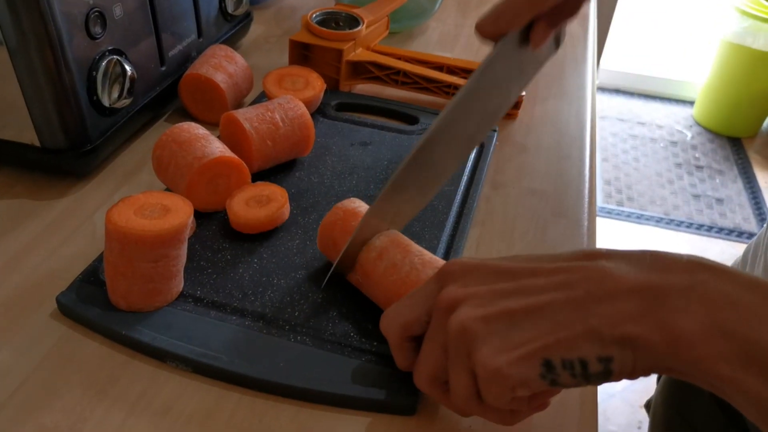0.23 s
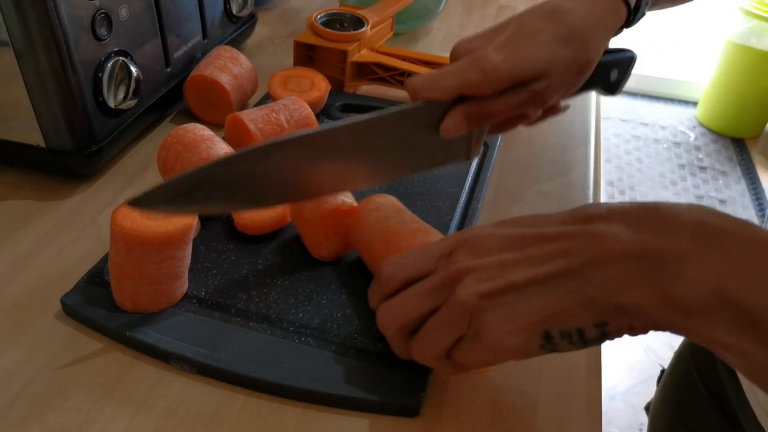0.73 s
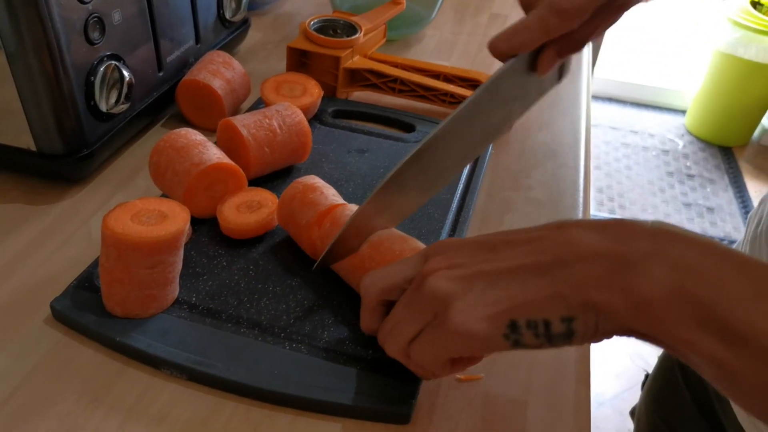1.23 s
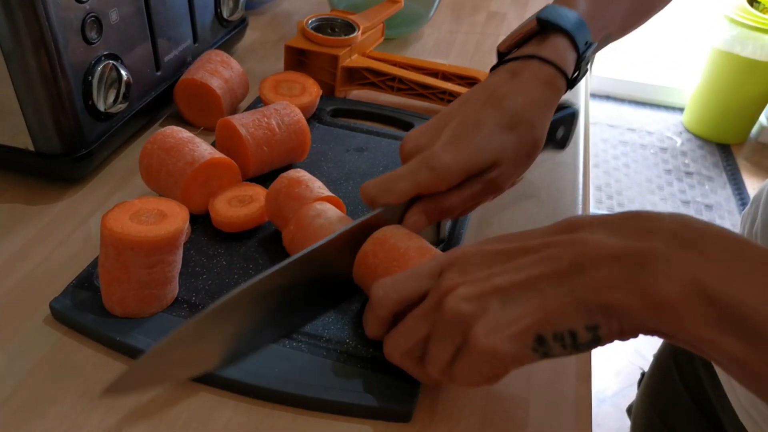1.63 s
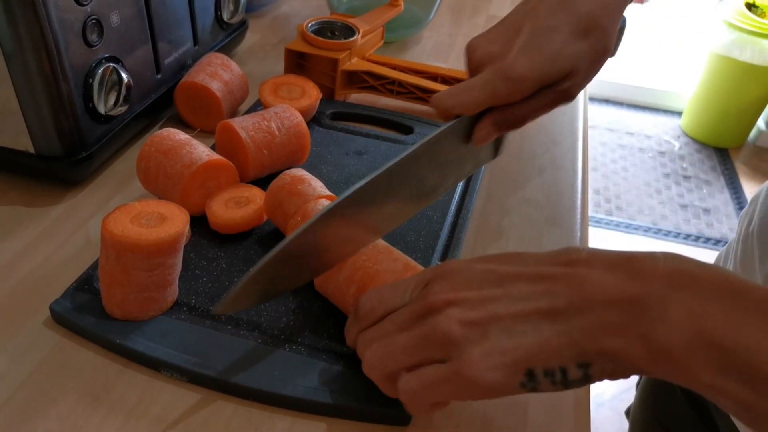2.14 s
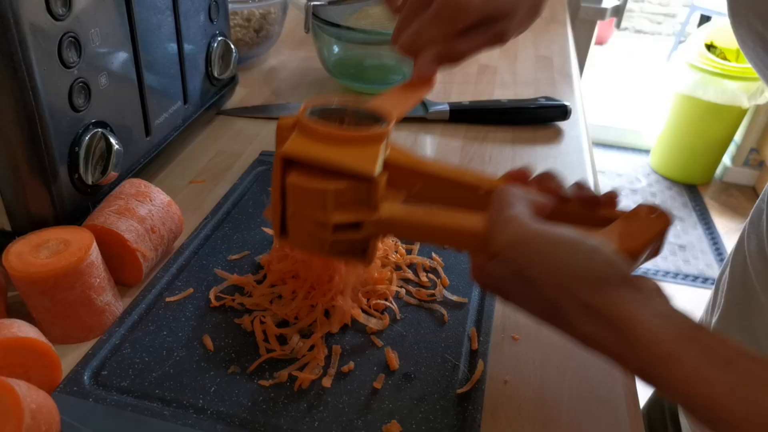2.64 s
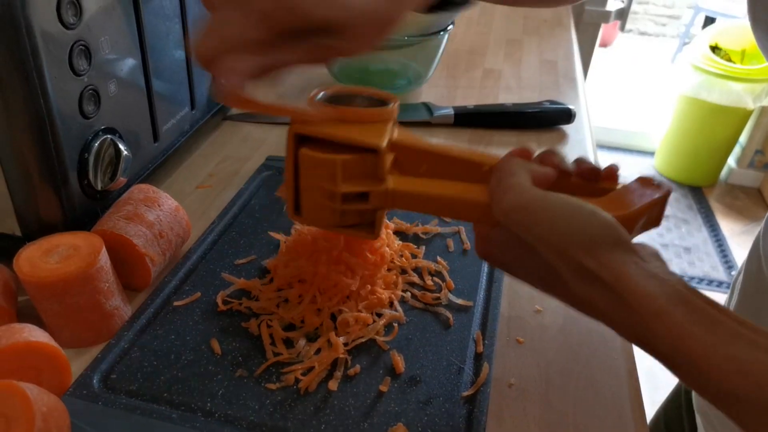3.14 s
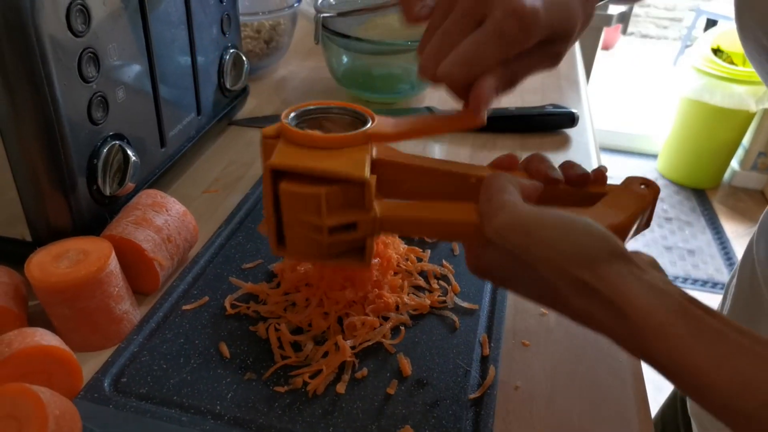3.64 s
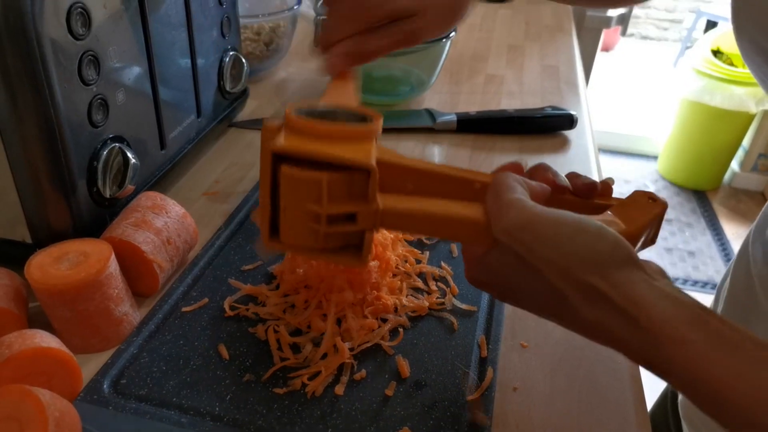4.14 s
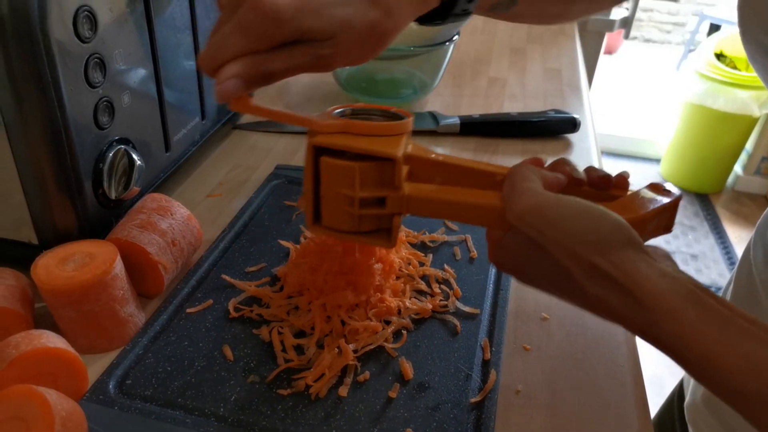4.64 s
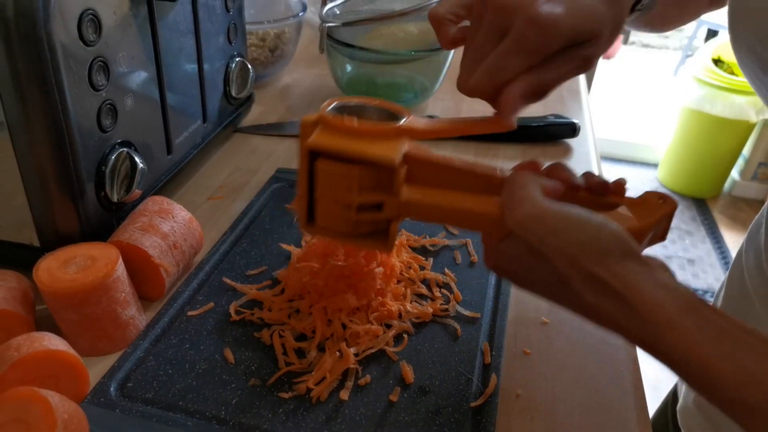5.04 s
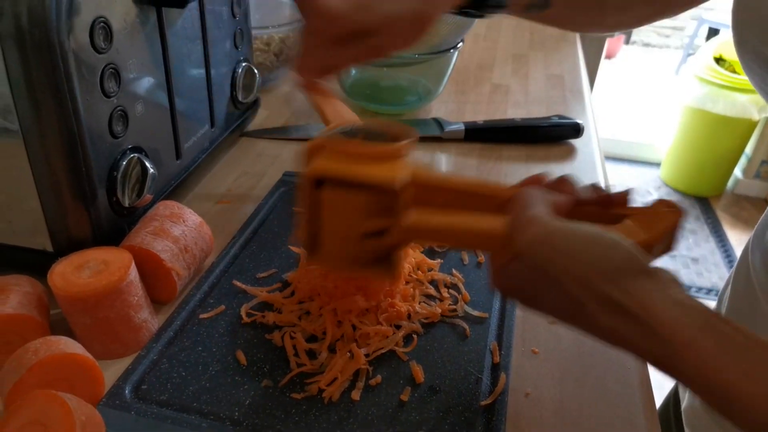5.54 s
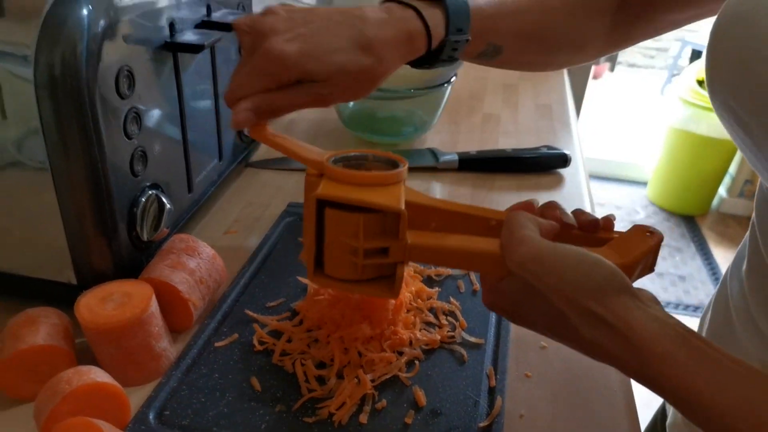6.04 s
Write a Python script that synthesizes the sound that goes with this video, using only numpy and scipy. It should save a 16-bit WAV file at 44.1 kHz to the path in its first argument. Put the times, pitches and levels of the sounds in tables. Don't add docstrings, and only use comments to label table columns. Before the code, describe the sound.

A knife crunches through raw carrot three times with wet snaps and hard board knocks, then, after a brief silence, a hand-cranked grater rasps rhythmically.

```python
import sys
import numpy as np
from scipy import signal
from scipy.fft import rfft, irfft, next_fast_len
from scipy.io import wavfile
from scipy.ndimage import uniform_filter1d

SR = 44100
rng = np.random.default_rng(int(sys.argv[2]) if len(sys.argv) > 2 else 0)


def store_pcm(level_fs):
    pcm = np.round(np.clip(level_fs, -1, 1) * 32767).astype(np.int16)
    wavfile.write(sys.argv[1], SR, np.atleast_2d(pcm).T)


def to_linear_factor(level_db):
    exponent = np.asarray(level_db, float) / 20
    return 10 ** exponent


N = 277829
TIME = np.arange(N) / SR
KNIFE_END_S = 2.9
CUT_S, SILENT_S, RESUME_S = 2.6625, 2.697, 3.067

# pitch_hz, density_db (per Hz)
HUM_SPECTRUM = [(22, -18), (42, 4.5), (106, -3.5), (352, -9.5), (404, -23), (631, -14.5), (985, -22),
                (1870, -21), (4070, -27.5), (7730, -29.5), (9660, -39.5), (12000, -42.5), (15500, -47.5)]
# pitch_hz, t60_s
KITCHEN_DECAY = [(100, 0.32), (500, 0.31), (2000, 0.33), (6000, 0.14), (14000, 0.22)]
# (pitch_hz, left_minus_right_db)
AT_BOARD = ([(60, 1), (500, 1), (1200, 0.54), (2500, 0.04), (4500, -0.3), (8000, -0.5), (15000, -2.6)],
            [(100, .04), (500, 0.2), (1500, 0.5), (4000, -3.5), (15000, -4.5)], [(60, 1.5), (600, 2),
            (1400, 0.5), (3000, -4.5), (5700, -6.5), (6700, -2.8), (7750, 18.5), (9000, 4), (11000, -2.5),
            (15000, -4)])
AT_GRATER = ([(45, .97), (100, .85), (250, .7), (700, .82), (1400, .7), (2050, .6), (2350, .33),
             (3100, .62), (3500, .35), (4200, .56), (5000, .27), (8000, .2), (15000, .1)], [(1100, .02),
             (1500, .5), (2400, .5), (3000, 2.3), (3600, 3.1), (4600, 3.7), (5500, 3.0), (7000, 3.6),
             (8000, 5.8), (11000, 9.5), (15000, 12.5)], [(300, 1.1), (1400, -2.5), (1750, .5),
             (2650, -10.5), (3200, -7.5), (3800, -.5), (5000, 5.5), (6300, 4.5), (7750, 17), (9300, 7.5),
             (15000, 15)])

# start_s, first_db, climb_s, peak_db, fade_db_per_s
LEANS = [
    (0, -52, 0.009, -64, 147),
    (.25, -70.5, 0.23, -63.5, 14),
    (.66, -58, 0.0079, -52.5, 65),
    (.83, -64, 0.014, -55, 148),
    (.97, -68.5, 0.14, -50, 311),
    (1.25, -73, 0.19, -52, 1),
    (1.5, -66.5, .09, -58.5, 34.5),
    (1.76, -52, 0.0036, -44.5, 99),
    (2.0, -69.5, 0.13, -68, 104),
    (2.28, -79, 0.28, -67.5, 408.5),
]
# pitch_hz, density_db (per Hz)
CREAK_SPECTRUM = [(29, -38), (50, -4.5), (101, -1), (367, -8.5), (455, -8), (585, -21), (784, -21),
                  (1200, -35), (1560, -68), (2640, -120)]
# pitch_hz, density_db (per Hz)
FIZZ_SPECTRUM = [(290, -48), (500, -9), (585, 2.5), (766, -25.5), (883, -7.5), (1020, -23), (1300, -13.5),
                 (1700, -24), (2200, -1.5), (4170, -4.5), (4600, -2.5), (5950, -4), (7790, 1),
                 (8860, -13.5), (15000, -27)]
# pitch_hz, level_db, t60_s
EDGE_MODES = [(1800, 3, 0.0088), (2790, -12.5, 0.03), (4200, -12.5, 0.016), (4360, -8.5, 0.015),
              (5700, -1, 0.024), (7260, -14.5, 0.005), (6345, -7, .01), (7940, -4, 0.036)]
# start_s, first_db, climb_s, peak_db, fade_db_per_s
SLIDES = [(0, -73.5, 0.2, -68, 164), (.28, -81, 0.047, -55, 5), (.33, -59, 0.071, -43.5, 7),
          (.397, -41.5, 0.064, -35.5, 275.5), (.505, -48, 0.099, -50.5, 244), (.675, -61, 0.0046, -54, 178),
          (1.086, -56.5, 0.0049, -52, 443), (1.135, -72, 0.037, -64.5, 199), (1.255, -66, 0.047, -57, 220),
          (1.362, -70, 0.043, -60, 5), (1.403, -56, 0.087, -34.5, 202), (1.535, -47.5, 0.025, -38, 251.5),
          (1.574, -54, 0.0097, -29.5, 601), (1.618, -52, .005, -41.5, 176.5), (1.758, -73, .006, -65.5, 93),
          (1.84, -76, 0.036, -70, 200), (2.152, -44, 0.0045, -48.5, 400), (2.21, -68, 0.068, -71, 141),
          (2.325, -72.5, 0.27, -54.5, -7.5), (2.568, -48, 0.017, -42.5, 104), (2.6, -44, 0.045, -33, 902)]
# time_s, edge_over_fizz_db, crispness_db, air_db
SINGING = [(.3, -5, 3.5, -1), (.44, -4.5, 3.5, 0.5), (.5, -4.5, 2, -4.5), (.6, -6, -0.5, -13.5),
           (1.05, -4, 0, -7.5), (1.1, -2, 4, 2), (1.4, -3, 3, 1), (1.49, -5, 2.5, 0), (1.559, -4.5, 2, -1),
           (1.6, -5, -0.5, -12.5), (1.8, -5, 1, -12), (1.87, -5.5, 5, -2), (2.2, -4.5, 1.5, 0),
           (2.55, -3, 5, 0.5), (2.641, -3.5, 3, 1.5)]
# pitch_hz, level_db, t60_s
BOARD = [(131, 0.5, 0.23), (195.7, -7.5, 0.019), (269, -6, 0.26), (376, -4, 0.11), (418, -9, 0.072),
         (600, 4.5, 0.05), (696, 1.5, 0.095), (855, 5.5, 0.025), (1048, -16, 0.021), (1197, 7.5, 0.03),
         (1269, 4, 0.058), (1650, 12, 0.0039), (1853, 2, 0.037), (2155, 6.5, 0.0059), (2760, 0, 0.04),
         (3120, 12.5, 0.004), (3200, -2.5, 0.011), (4190, -6.5, 0.011), (4550, 10, 0.014),
         (5240, -14.5, .01)]
# pitch_hz, level_db, t60_s
BLADE = [(5780, 12.5, 0.053), (7550, -8, .05), (9520, -16, 0.028)]
# pitch_hz, level_db, t60_s
CARROT = [(860, -19, 0.034), (1215, -1, .035), (1253, -3.5, .07), (1495, -9, 0.033), (1904, -10, 0.044),
          (2400, -4.5, 0.033)]
# time_s, peak_db, favoured_hz, rattle_s
SNAPS = [
    (.4462, -8.5, 1560, 0.0044),
    (.452, -16, 2075, 0.0022),
    (.461, -25, 1700, 0.0044),
    (1.5072, -12, 1462, 0.0057),
    (1.5125, -13.5, 1422, 0.0044),
    (2.642, -7.5, 1666, 0.0025),
    (2.6465, -11, 1526, .003),
]
# time_s, peak_db, favoured_hz, rattle_s
STRIKES = [
    (.519, -14, 815, 0.0058),
    (.5245, -11, 630, 0.004),
    (.574, -33.5, 635, 0.019),
    (1.581, -14, 644, 0.0083),
    (1.6115, -18, 800, 0.0025),
    (1.631, -21, 800, 0.0036),
    (2.652, -16, 490, 0.0036),
    (2.6585, -19.5, 1286, 0.0048),
]
# time_s, peak_db, favoured_hz, rattle_s
SLAPS = [
    (.541, -14, 1468, 0.0051),
    (.546, -13, 1230, 0.0027),
    (1.7645, -28, 1216, 0.0069),
]
# time_s, peak_db, favoured_hz, rattle_s
LANDINGS = [
    (1.5895, -4.5, 1100, 0.0041),
    (1.5935, -9, 1527, 0.0017),
    (1.599, -17.5, 1183, .003),
]
# time_s, peak_db, favoured_hz, rattle_s
TAPS = [
    (.943, -55, 1300, .0005),
    (1.0835, -39.5, 900, 0.0002),
    (1.896, -60, 1800, 0.0051),
]
# time_s, peak_db, favoured_hz, rattle_s
THUMPS = [
    (.522, -31.5, 135, .005),
    (1.583, -24, 135, .005),
    (2.644, -34.5, 140, 0.0033),
    (1.003, -50, 122, 0.0039),
    (1.101, -53, 139.4, 0.02),
    (1.14, -58, 130, 0.012),
    (2.168, -49.5, 131, 0.0072),
    (2.51, -56.5, 251, 0.026),
    (2.56, -54, 255, 0.036),
    (2.605, -44.5, 255, 0.022),
]
# time_s, peak_db, favoured_hz, rattle_s
TIPS = [
    (1.085, -48.5, 2400, 0.0076),
    (2.142, -70, 3000, 0.0012),
    (2.153, -49, 2540, 0.0043),
]
# time_s, peak_db, favoured_hz, rattle_s
ROLLS = [
    (.780, -42.5, 440, 0.0065),
    (.798, -44.5, 402, 0.0039),
    (.85, -51, 600, 0.0067),
    (.868, -53, 503, 0.0077),
    (1.895, -45.5, 405, 0.0059),
    (1.912, -56, 333, 0.0041),
    (1.947, -59, 244.7, 0.017),
    (2.514, -52.5, 1750, .014),
]
# blows (a table above), spread_octaves, partner_modes, partner_db, dry_crack_db
KINDS = [
    (SNAPS, 0.464, CARROT, 4, -15),
    (STRIKES, 1.1, BLADE, -36, -19),
    (LANDINGS, .9, BLADE, -16.5, -22.5),
    (SLAPS, 0.71, BLADE, -33, -15),
    (TAPS, 1.25, BLADE, -37, -18),
    (TIPS, .3, BLADE, -20, -12),
    (ROLLS, .5, BLADE, -60, -36.5),
    (THUMPS, 0.27, BLADE, -70.5, -50),
]

# pitch_hz, density_db (per Hz)
SHAKE_SPECTRUM = [(22, -11), (38, 2), (48, -3.5), (60, -19), (70, -33), (102, 2), (173, -37.5), (400, -20),
                  (520, -70), (880, -120)]
# pitch_hz, density_db (per Hz)
DRUM_SPECTRUM = [(250, -29.5), (430, -30.5), (620, -21.5), (800, -22.5), (1270, -16), (1780, -13.5),
                 (2050, -3), (3070, 1), (4250, -12), (5530, -8), (6500, -14), (7800, -7), (9900, -23.5),
                 (15000, -27.5)]
# pitch_hz, level_db, t60_s
HOUSING_MODES = [(800, 6.5, 0.044), (1499, 2.5, 0.184), (2089, 18.5, 0.059), (2700, -45, 0.056),
                 (2980, 9.5, 0.104), (3200, 12, 0.2), (3570, 4, 0.097), (4596, 2, 0.18), (5940, -29, 0.051),
                 (7950, 12.5, 0.17), (9400, 0, 0.024)]
# start_s, first_db, climb_s, peak_db,
# fade_db_per_s
STROKES = [(3.068, -45, 0.045, -34.5, 326.5), (3.224, -45, 0.061, -37, 391), (3.36, -51.5, 0.042, -39, 2),
           (3.53, -47, 0.078, -33, 264), (3.743, -43, 0.061, -35.5, 151), (3.905, -52, 0.061, -31.5, 291),
           (4.109, -38.5, 0.059, -33.5, 177), (4.24, -38, 0.14, -33.5, 100), (4.41, -36, 0.06, -37, -5),
           (4.567, -27, 0.0046, -29.5, 163), (4.615, -36, 0.044, -33.5, 321),
           (4.807, -33.5, 0.063, -34.5, 392), (4.89, -39, 0.065, -37.5, 170),
           (4.98, -36.5, 0.095, -33, 55.5), (5.09, -39, 0.026, -32.5, 151), (5.22, -43.5, 0.088, -30, 446),
           (5.352, -29.5, 0.012, -33, 202), (5.41, -42.5, 0.053, -30, 148), (5.495, -32, 0.0032, -33, 397),
           (5.6, -38, 0.062, -30.5, 142), (5.7, -34, 0.05, -32, 150), (5.78, -39, 0.0063, -29.5, 306),
           (5.825, -38.5, 0.075, -35, -12), (5.95, -27, 0.038, -32, 19),
           (4.074, -59, 0.031, -48.5, 7),
    (5.573, -67, 0.024, -47.5, 9),
    (6.075, -32, 0.073, -33.5, 152),
    (6.198, -34.5, 0.019, -33, 13.5),
]
# time_s, peak_db, favoured_hz
CATCHES = [(3.0745, -31, 2850), (3.1098, -23, 2670), (3.1216, -13.5, 2700), (3.0847, -21, 2700),
           (3.222, -27.5, 3280), (3.2496, -15, 3050), (3.572, -26, 2540), (3.2961, -26, 3480),
           (3.6119, -41, 2610), (3.742, -19.5, 2975), (3.9353, -32, 3020), (4.107, -27, 2802),
           (4.1143, -24, 3010), (4.2029, -9.5, 3200), (4.339, -35, 2790), (4.5695, -8.5, 2000),
           (4.808, -15.5, 1840), (5.063, -29, 2430), (5.1144, -39, 2570), (5.2795, -20, 2840),
           (5.3145, -15, 3000), (5.3214, -13.5, 2100), (5.3269, -13.5, 2300), (5.361, -22, 2800),
           (5.4322, -21, 3050), (5.4568, -18, 2980), (5.4655, -9, 2980), (5.603, -25, 2550),
           (5.612, -23, 3050), (5.6395, -16, 3270), (5.654, -12, 3100), (5.788, -17, 2560),
           (5.8743, -14.5, 2140), (5.9556, -8.5, 2800), (6.0144, -19, 3120), (6.0894, -18.5, 2910),
           (6.2022, -27, 2840)]


def evened(x):
    return x / np.sqrt(np.mean(x ** 2) + 1e-20)


def band_level(x, lo_hz, hi_hz):
    z, hz = rfft(x[0]), np.fft.rfftfreq(N, 1 / SR)
    band = (hz > lo_hz) & (hz < hi_hz)
    return x / np.sqrt(2 * np.sum(abs(z[band]) ** 2)) * N


def read(points, hz):
    f, value = np.transpose(points)
    return np.interp(np.log(hz + 1), np.log(f + 1), value)


def coloured(x, points):
    gain_db = read(points, abs(np.fft.fftfreq(4096, 1 / SR)))
    log_gain = np.log(to_linear_factor(np.maximum(gain_db, -100)))
    taps = np.fft.ifft(np.exp(np.conj(signal.hilbert(log_gain)))).real[:2048]
    return signal.oaconvolve(x, taps[None], axes=1)[:, :N]


def filtered(x, order, edge_hz, kind):
    return signal.sosfilt(signal.butter(order, edge_hz, kind, fs=SR, output="sos"), x)


def above(x, edge_hz):
    return filtered(x, 3, edge_hz, "high")


def upper(x, edge_hz):
    return signal.sosfiltfilt(signal.butter(3, edge_hz, "high", fs=SR, output="sos"), x)


def smoothed_twice(x, size):
    return uniform_filter1d(uniform_filter1d(x, size), size)


def wander(depth_db):
    return depth_db * evened(smoothed_twice(rng.standard_normal(N), 1500))


def efforts(rows, rest_db, bend):
    rows = np.array(rows)
    current = np.maximum(np.searchsorted(rows[:, 0], TIME) - 1, 0)
    start, first_db, climb, peak_db, fade = rows[current].T
    since = TIME - start
    climb = np.maximum(climb, 1e-3)
    rise = (peak_db - first_db) * np.clip(since / climb, 0, 1)
    fall = fade / 10 * (10 * np.maximum(since - climb, 0)) ** bend
    return uniform_filter1d(np.maximum(first_db + rise - fall, rest_db), size=200)


def grit(per_s, spread_db, flutter_db, flutter_s):
    size = to_linear_factor(spread_db * np.minimum(rng.exponential(1, (2, N)), 4))
    happens = rng.random((2, N)) < per_s / SR
    train = size * rng.standard_normal((2, N)) * happens
    width = max(int(flutter_s * SR), 1)
    flutter = evened(smoothed_twice(rng.standard_normal(N), width))
    return train * to_linear_factor(flutter_db * flutter)


def patchy(x, depth_db, bins=2, frames=7):
    z = signal.stft(x, nperseg=512, noverlap=384)[2]
    field = rng.standard_normal(z.shape[1:])
    for _ in range(2):
        field = uniform_filter1d(uniform_filter1d(field, bins, 0), frames, 1)
    return signal.istft(z * to_linear_factor(depth_db * evened(field)), nperseg=512, noverlap=384)[1][:, :N]


def rings(modes, favoured_hz=1000, octaves=np.inf, detune=0., size=6000):
    hz, db, t60 = np.transpose(modes)[:, :, None]
    hz = hz * (1 + detune * rng.standard_normal(hz.shape))
    t = TIME[:size]
    weight = np.exp(-0.5 * (np.log2(hz / favoured_hz) / octaves) ** 2)
    weight = weight + 0.015 * (hz < favoured_hz)
    sign = (-1.) ** np.arange(len(modes))[:, None]
    return (sign * weight * to_linear_factor(db - 60 * t / t60) * np.sin(2 * np.pi * hz * t)).sum(0)


def add(mix, s, peak_db, rattle_s, body):
    u = TIME[:2000] / max(rattle_s, 1e-6)
    first_touch = 0.6 * np.exp(-8 * u)
    burst = np.exp(-np.minimum(u, 9) ** 4)
    settling = 0.3 * np.exp(-u / 1.6)
    force = first_touch + burst + settling
    contacts = rng.choice([-1., 1.], (2, len(u))) * force
    sound = signal.fftconvolve(contacts, body[None], axes=1)
    sound = sound / abs(sound).max(1, keepdims=True)
    part = mix[:, round(s * SR):][:, :sound.shape[1]]
    part += to_linear_factor(peak_db) * sound[:, :part.shape[1]]


def room_hum():
    noise = to_linear_factor(-66.5) * evened(coloured(rng.standard_normal((2, N)), HUM_SPECTRUM))
    phase = 2 * np.pi * np.cumsum(97 + wander(1.2)) / SR
    return noise + to_linear_factor(-74 + wander(1.7)) * np.sin(phase)


def kitchen(x, wet_db):
    taps = np.zeros((2, SR // 2))
    slots = np.arange(200, SR // 2 - 20, 20)
    at = slots + rng.integers(0, 20, (2, len(slots)))
    np.put_along_axis(taps, at, rng.choice([-1., 1.], at.shape), 1)
    hz, t, z = signal.stft(taps, SR, nperseg=256)
    decay = to_linear_factor(-60 * t / read(KITCHEN_DECAY, hz)[:, None])
    tail = signal.istft(z * decay, SR, nperseg=256)[1]
    return to_linear_factor(wet_db) * signal.fftconvolve(x, tail / np.linalg.norm(tail[0]), axes=1)[:, :N]


def creak():
    level_db = efforts(LEANS, -88.0, 0.52)
    slips = coloured(grit(1100, 2.3, 3.4, 0.014), CREAK_SPECTRUM)
    return to_linear_factor(level_db - 1.5) * band_level(slips, 73, 500)


def fizz():
    level_db = efforts(SLIDES, -98, 0.97)
    at, *colours = np.transpose(SINGING)
    sing_db, crisp_db, air_db = (np.interp(TIME, at, db) for db in colours)
    cells = grit(12000, 1.5, 0.46, 0.002)
    edge = signal.oaconvolve(cells, rings(EDGE_MODES)[None], axes=1)[:, :N]
    sound = band_level(coloured(cells, FIZZ_SPECTRUM), 4000, 10000) + to_linear_factor(sing_db) * evened(edge)
    sound = sound + (to_linear_factor(crisp_db) - 1) * upper(sound, 4300)
    sound = sound + (to_linear_factor(air_db) - 1) * upper(sound, 9000)
    return to_linear_factor(level_db) * band_level(patchy(sound, 0.81), 2900, 10000)


def blows():
    ringing, thrown, cracks = np.zeros((3, 2, N))
    for rows, octaves, partner, partner_db, crack_db in KINDS:
        spread = max(octaves, 0.2)
        for s, db, hz, rattle_s in rows:
            board = rings(BOARD, hz, spread, detune=0.04)
            add(ringing, s, db, rattle_s, board + to_linear_factor(partner_db) * rings(partner, detune=0.01))
            onset = rings(BOARD, hz, 1.2 * spread, size=600) * np.exp(-TIME[:600] / 0.0022)
            add(thrown, s, db + 10 * np.log10(rattle_s / 0.0015), 0, onset)
            add(cracks, s, db + crack_db, rattle_s, np.ones(1))
    cracks = filtered(cracks, 3, [1700, 7000], "band")
    ringing += cracks + kitchen(thrown + to_linear_factor(-4) * cracks, -4.5) + kitchen(ringing, -16.5)
    ringing = filtered(ringing, 3, [75, 8500], "band")
    return filtered(ringing, 2, 11000, "low")


def knife():
    return (creak() + fizz() + blows()) * (TIME < KNIFE_END_S)


def shake():
    return to_linear_factor(-64.5) * evened(coloured(grit(6100, 0.55, 1.3, 0.039), SHAKE_SPECTRUM))


def catches():
    sound = np.zeros((2, N))
    damped = [(hz, db, t60 / 5) for hz, db, t60 in HOUSING_MODES]
    for s, db, hz in CATCHES:
        add(sound, s, db - 9.5, 0.0008, rings(damped, hz, 0.36, detune=0.03, size=2500))
    return above(sound, 1260)


def shredding():
    scrape_db = efforts(sorted(STROKES), -67.0, 1.53)
    load_db, since = scrape_db + 36, TIME - RESUME_S
    bright_db = -7 - 0.22 * load_db + 0.95 * since + wander(1.05)
    full_db = -3.5 + 0.47 * load_db - 2 * since + wander(1.05)
    rasp = evened(grit(14000, 0.83, 0.99, 0.0091))
    crackle = evened(grit(2500, 4.6, 1.8, 0.004))
    tearing = rasp + to_linear_factor(-7) * crackle
    housing = above(signal.oaconvolve(tearing, rings(HOUSING_MODES)[None], axes=1)[:, :N], 830)
    drum = band_level(coloured(tearing, DRUM_SPECTRUM), 2070, 4600) + to_linear_factor(-8.5) * evened(housing)
    drum = patchy(drum, 2.1, frames=5)
    teeth = (to_linear_factor(bright_db + 5.5) - 1) * above(drum, 3130)
    body = (to_linear_factor(full_db + 9.0) - 1) * filtered(drum, 2, 2000, "low")
    return to_linear_factor(scrape_db - 2) * (drum + teeth + body)


def grater():
    sound = shredding() + catches()
    return (sound + kitchen(sound, -16) + shake()) * (TIME > KNIFE_END_S)


def ports(pair, view):
    size = next_fast_len(N + 4096)
    hz = np.fft.rfftfreq(size, 1 / SR)
    same, lead, tilt_db = (read(table, hz) for table in view)
    same = np.clip(same, 0, 1)
    a, b = rfft(pair, size)
    left, right = to_linear_factor(tilt_db / 2), to_linear_factor(-tilt_db / 2)
    shared = right * same * np.exp(-1j * lead)
    own = right * np.sqrt(1 - same ** 2)
    centre = np.sqrt(abs(left + shared) ** 2 + own ** 2) / 2
    return irfft(np.array([left * a, shared * a + own * b]) / centre, size)[:, :N]


def scene():
    return ports(knife() + room_hum(), AT_BOARD) + ports(grater(), AT_GRATER)


def scene_change():
    fading_db = -2.5 + (TIME > CUT_S) * (-9 - 1100 * (TIME - CUT_S))
    db = np.where(TIME > SILENT_S, -120, fading_db)
    db = np.where(TIME > RESUME_S, 0.15, db)
    return to_linear_factor(uniform_filter1d(db, size=150))


def band_limit(x):
    return signal.sosfilt(signal.butter(12, 15740, fs=SR, output="sos"), x)


def record(dry):
    lowpass = signal.firwin(511, 15200, window=("kaiser", 9), fs=SR)
    limited = signal.oaconvolve(dry, lowpass[None], "same")
    return band_limit(limited * scene_change())


dry = scene()
out = record(dry)
store_pcm(out)
```